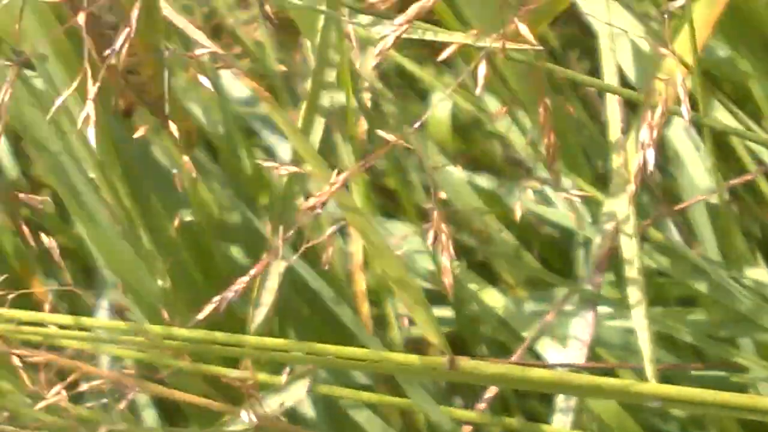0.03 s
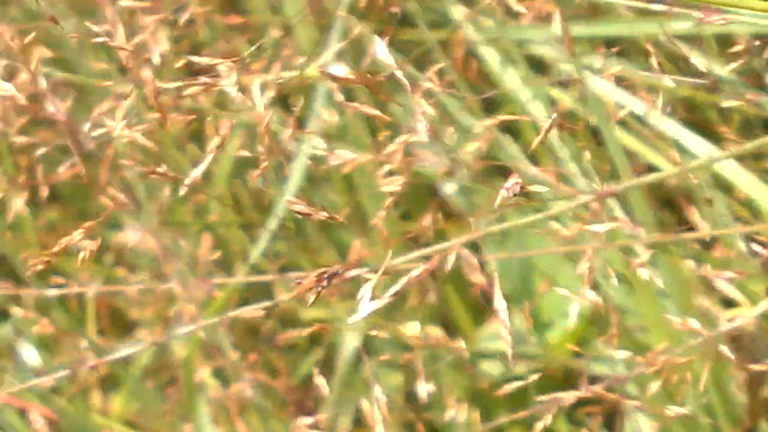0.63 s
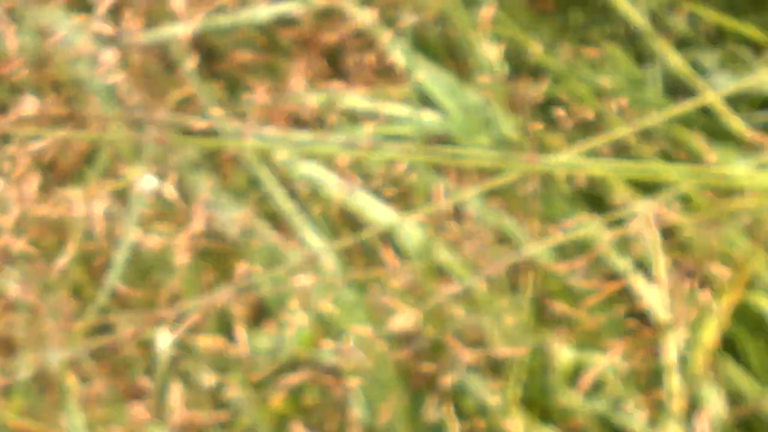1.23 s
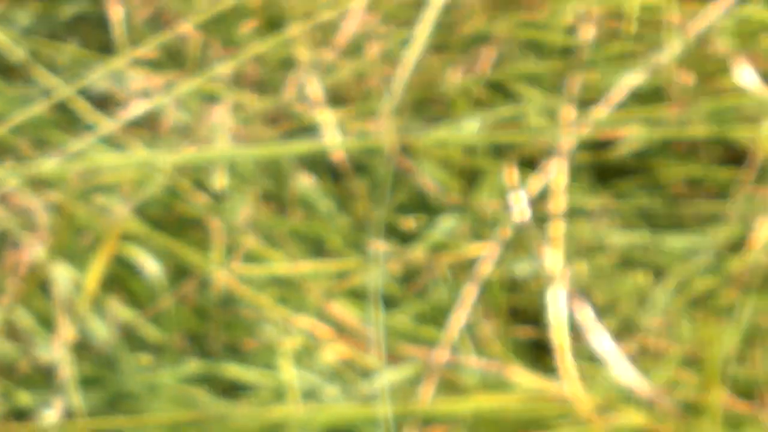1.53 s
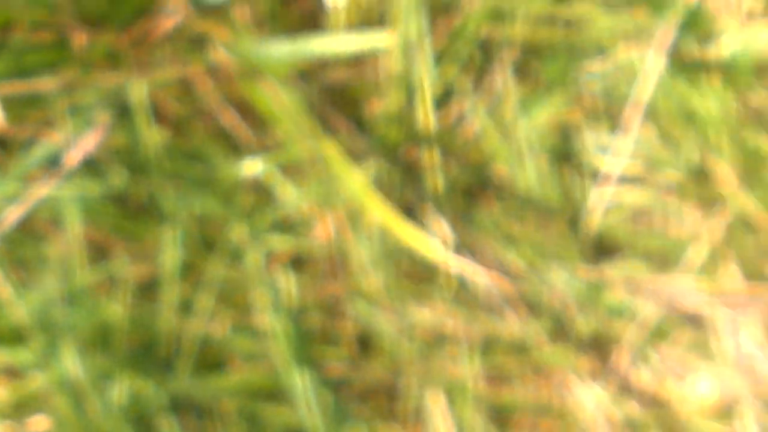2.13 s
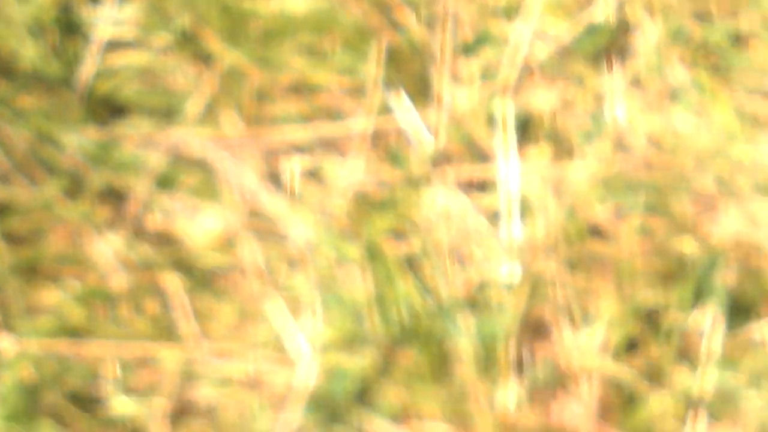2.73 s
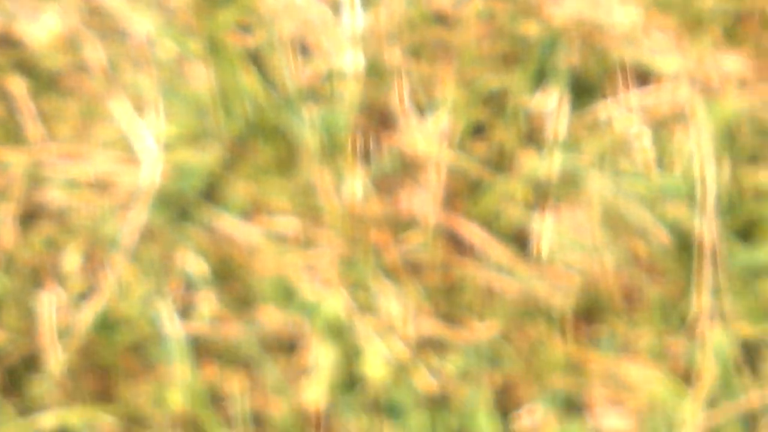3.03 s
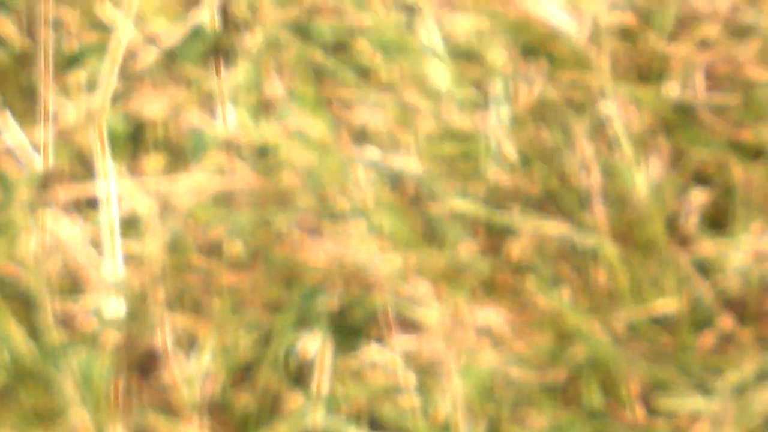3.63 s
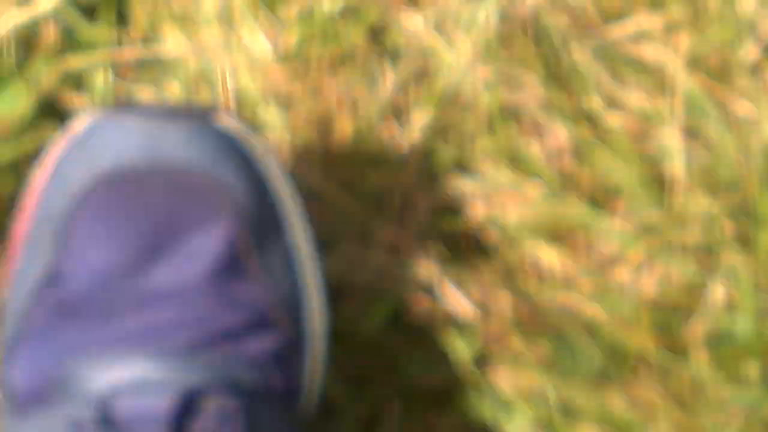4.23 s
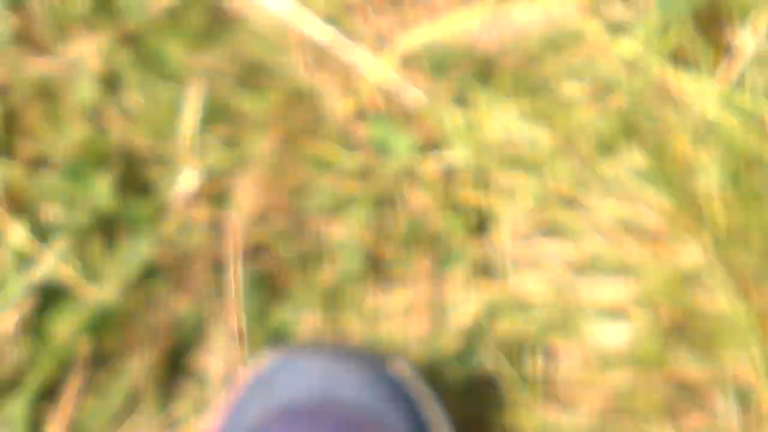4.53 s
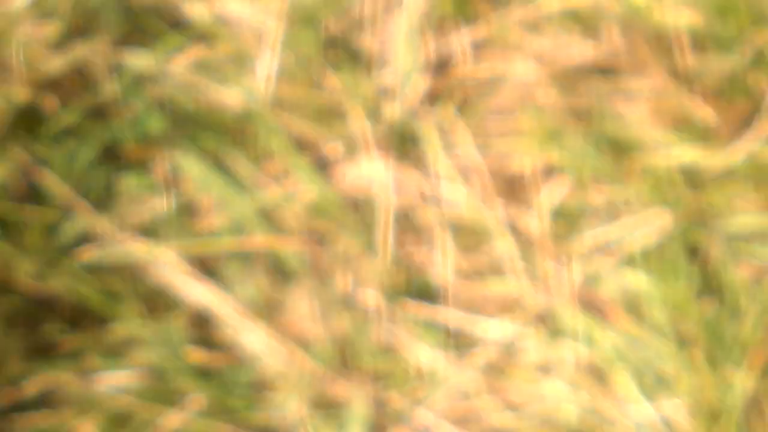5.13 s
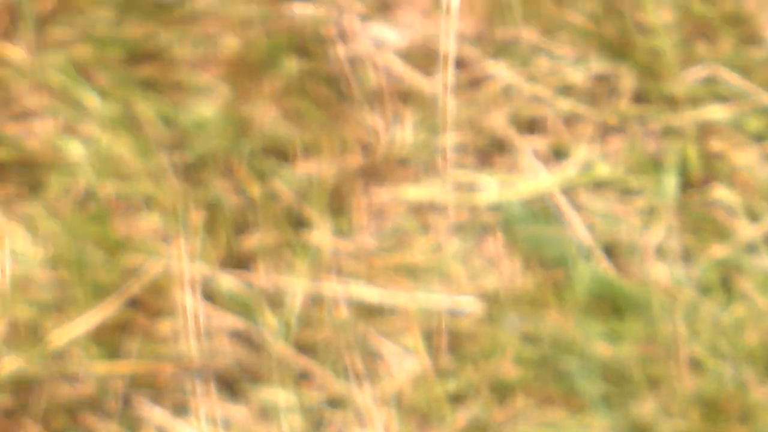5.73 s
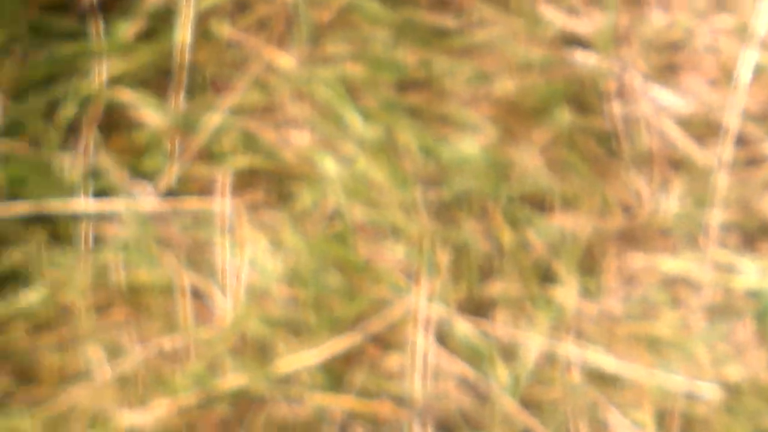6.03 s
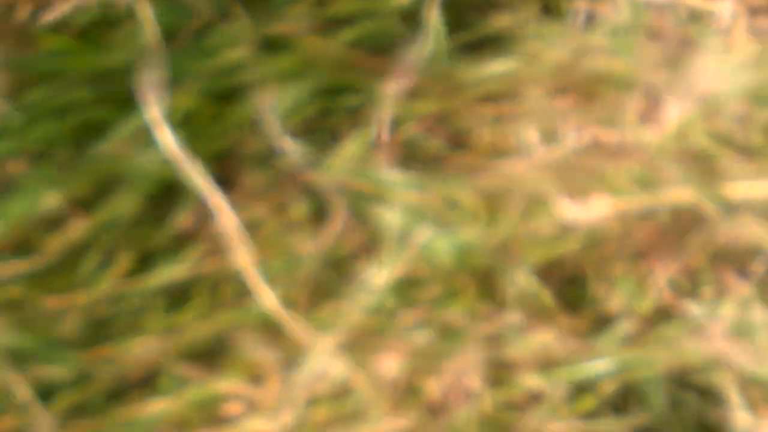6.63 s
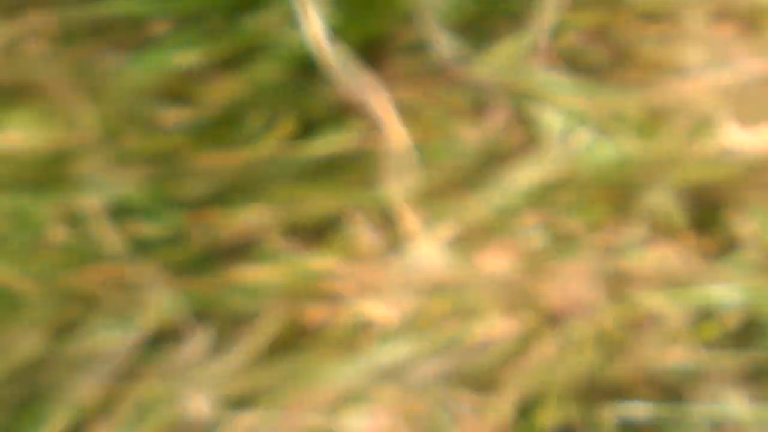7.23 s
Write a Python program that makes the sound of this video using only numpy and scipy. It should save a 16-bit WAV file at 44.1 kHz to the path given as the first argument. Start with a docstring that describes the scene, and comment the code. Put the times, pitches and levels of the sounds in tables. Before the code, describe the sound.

A sudden loud, rasping insect buzz up close, after faint steps in meadow grass under a high cricket trill.

```python
"""Close insect in a summer meadow

Bush-crickets file out a high trill over a bed of still air, rumble and a faint far drone.
Slow steps crunch the turf, swish through dry grass and snap the odd stalk. Late on, a fly-sized
insect arrives right up close, its wing tips slapping against something for a moment.
Then it hovers free on the hum of its wingbeat, swerving, and darts off."""
import sys
import numpy as np
from scipy import signal
from scipy.fft import rfft, irfft
from scipy.io import wavfile
from scipy.ndimage import uniform_filter1d

SR = 44100
rng = np.random.default_rng(int(sys.argv[2]) if len(sys.argv) > 2 else 0)


def wav_record(signal):
    """Record a signal, one row per channel, as 16-bit PCM in the file named by sys.argv[1]."""
    frames = np.transpose(np.atleast_2d(signal))
    bounded = np.clip(frames, -1, 1)
    # unit amplitude maps onto the largest positive 16-bit level
    quanta = np.round(bounded * 32767).astype(np.int16)
    wavfile.write(sys.argv[1], SR, quanta)


N = 330750
TIME = np.arange(N) / SR

# Tone curves for still air, low rumble, turf underfoot, swishing stems and cricket song.
# Each row: frequency in Hz, relative level in dB.
AIR_EQ = [(100, -9), (170, 0.5), (300, -3), (550, -9), (1200, -12), (2500, -15.5), (5000, -14),
          (7000, -15.5), (8600, -23.5), (10000, -18), (11500, -26), (16000, -35.5)]
RUMBLE_EQ = [(8.8, -44), (15, -9.5), (54, 0.5), (75, 1), (95, -5.5), (124, -7.5), (200, -23), (260, -36.5),
             (440, -120)]
TREAD_EQ = [(88, -39), (150, 1), (541, 3.5), (798, -2.5), (1400, -17), (2170, -17), (2500, -26.5),
            (3250, -55), (5500, -120)]
SWISH_EQ = [(590, -6), (1000, 3.5), (1470, -3.5), (2180, -3), (2550, -5), (3750, -0.5), (4610, -0.5),
            (8780, -17), (12000, -12), (15600, -44), (22000, -120)]
CRICKET_EQ = [(8500, -49), (10000, -33), (11600, -33.5), (12300, -25), (13000, -15), (14300, -3.5),
              (15600, 0.5), (16500, -4.5)]
# Puffs of air. Each row: centre in seconds, length in seconds, level in dB.
PUFFS = [(2.5, 0.27, -75.5), (3.844, 0.12, -69), (4.45, 0.73, -72), (5.25, 0.18, -75), (6.906, 0.69, -69.5),
         (7.322, .18, -63)]
# The far drone. Each row: centre in seconds, length in seconds, pitch in Hz, level in dB.
DRONE_SWELLS = [(0.198, 0.51, 75.7, -62), (.62, 0.34, 78, -65.5), (1.4, 0.67, 84.3, -66),
                (2.457, 0.26, 95.9, -59.5), (3.155, 0.19, 82.5, -65)]
# Thin, steady whines. Each row: pitch in Hz, level in dB.
WHINES = [(3620, -88), (5790, -84.5), (7960, -98)]
# Steps and shifts of weight. Each row: centre and length in seconds, tread and swish levels in dB.
STEPS = [(1.0, 0.47, -86, -91), (2.16, 0.79, -78.5, -73.5), (3.0, 0.79, -73.5, -83.5),
         (3.925, 0.17, -67.5, -72), (4.264, 0.86, -75, -73), (4.938, 0.34, -71, -83.5),
         (5.225, 0.29, -65, -71), (5.588, 0.24, -75.5, -71.5), (6.017, 0.35, -77.5, -74.5),
         (6.456, 0.56, -73, -78.5)]
# Seed heads brushing past. Each row: centre in seconds, length in seconds, level in dB.
BRUSHES = [(2.033, 0.31, -66), (2.567, 0.1, -72), (2.847, 0.38, -68.5), (3.164, 0.062, -67),
           (4.25, 0.15, -63), (4.873, 0.25, -63), (5.042, 0.18, -63), (5.207, .05, -57),
           (5.286, 0.065, -56), (5.592, 0.061, -65)]
# Stalks snapping and turf knocking. Each row: start in seconds, peak in dB, pitch in Hz.
SNAPS = [(2.251, -54, 3500), (3.654, -57, 470), (3.71, -49, 2040), (4.135, -54, 3250), (4.85, -54, 4000),
         (4.868, -57.5, 444), (5.046, -54, 5900), (5.112, -51, 2300), (5.1252, -38, 2250),
         (5.177, -54, 460), (5.199, -45.5, 517), (5.232, -55, 700), (5.279, -57, 450), (5.313, -51, 480),
         (5.35, -53, 472), (5.363, -55.5, 970), (5.722, -41.5, 2900), (5.727, -49, 3300),
         (5.944, -55, 4500), (5.956, -53, 4800)]
# The near cricket's verses. Each row: start in seconds, seconds until the fade, opening level in dB.
VERSES = [(1.91, 0.27, -48.5), (2.55, 0.74, -49.5), (4.153, 0.87, -48.5), (5.656, 1.31, -47.5),
          (7.37, 0.16, -46.5)]
# The insect closing in. Each row: time in seconds, level in dB relative to its closest.
APPROACH = [(6.38, -47), (6.49, -17.5), (6.555, -14), (6.584, 0)]
# Its flight, surging and slackening. Each row: time in seconds, wingbeat in Hz, buzz level in dB.
FLIGHT = [(6.44, 327.5, -82), (6.558, 310.9, -67), (6.586, 335.4, -29.5), (6.63, 320.1, -30.5),
          (6.71, 317.1, -32.5), (6.78, 307.5, -47), (6.87, 307.5, -47), (6.93, 316, -35),
          (6.99, 323.5, -31), (7.056, 309.3, -36), (7.115, 322, -29), (7.165, 310.3, -34.5),
          (7.21, 304.5, -38.5), (7.26, 316.3, -32), (7.305, 318, -30), (7.35, 304.2, -40),
          (7.392, 329, -28.5), (7.447, 327, -26.5), (7.48, 302, -44)]
# Overtones of the wing stroke. Each row: multiple of the wingbeat, relative level in dB.
WING_OVERTONES = [(3, -2.5), (4, -14), (5, -20.5), (6, -30.5), (7, -27), (8, -33), (9, -37.5), (10, -43.5),
                  (12, -46.5), (14, -57), (17, -59.5), (24, -59.5)]
# Runs of wing slaps.
# Each row: start and end in seconds, wingbeats per slap, relative level in dB, unsteadiness from 0 to 1.
SLAP_RUNS = [(6.5732, 6.602, 2, -1, .35), (6.6039, 6.634, 2, -.5, .55), (6.635, 6.769, 2, 2, 0.17),
             (6.7743, 6.828, 2, 1, .28), (6.8302, 6.892, 2, 1.5, .33), (6.8957, 6.924, 2, 0, 0.52),
             (6.9307, 6.972, 3, 2.3, .4)]
# The resonances a slap rings. Each row: frequency in Hz, width in Hz, relative level in dB.
SLAP_MODES = [(808, 335, 6), (1060, 250, -1.5), (2400, 780, -1.5), (2900, 360, 1.5), (4500, 3100, -7),
              (5400, 900, -8.5), (6830, 1160, -5), (7540, 1140, -8), (9270, 2800, -14.5), (12080, 350, -7),
              (12900, 1000, -11), (15100, 4400, -14)]

CRUISE_HZ, CRUISE_DB = 316, -30.5
TOUCH_S, PRESSED_S, FREE_S, TURN_AWAY_S = 6.6, 6.604, 6.925, 7.478  # the insect's cues


def amp(db):
    """Decibels to gain."""
    return 10 ** (np.asarray(db) / 20)


def unit(x):
    """Scales to an rms of 1."""
    return x / np.sqrt(np.mean(x ** 2) + 1e-20)


def curves(rows):
    """Turns each column of a table into a straight-line envelope."""
    s, *columns = np.transpose(rows)
    return [np.interp(TIME, s, c) for c in columns]


def ramp(s, length):
    """Rises from 0 to 1, starting at time s."""
    return np.clip((TIME - s) / length, 0, 1)


def swell(s, length, skew=0.071):
    """A soft rise to 1 at time s and a slightly slower fall."""
    u = 2 * (TIME - s) / length
    return np.exp(-(u / (1 + skew * np.tanh(u))) ** 2)


def colour(x, eq):
    """Shapes x with a tone curve and scales it to an rms of 1."""
    hz, db = np.transpose(eq)
    bins = np.fft.rfftfreq(N, 1 / SR)
    gain = amp(np.interp(np.log(bins + 1), np.log(hz + 1), db))
    return unit(irfft(rfft(x) * gain, N))


def noise():
    """White noise."""
    return rng.standard_normal(N)


def wander(hz):
    """Smooth random modulation, rolled off above hz."""
    return unit(irfft(rfft(noise()) / (1 + (np.fft.rfftfreq(N, 1 / SR) / hz) ** 4), N))


def add(mix, s, sound):
    """Mixes a sound in at time s."""
    part = mix[round(s * SR):][:len(sound)]
    part += sound[:len(part)]


def ring(modes, size=2048):
    """The causal impulse response of a set of resonances, with energy 1."""
    hz = abs(np.fft.fftfreq(size, 1 / SR))
    power = sum(amp(db) ** 2 / (1 + (2 * (hz - f) / width) ** 2) ** 2 for f, width, db in modes)
    minimum_phase = np.exp(np.conj(signal.hilbert(np.log(power) / 2)))
    response = np.fft.ifft(minimum_phase).real
    return response / np.linalg.norm(response)


def background(air_db=-72, rumble_db=-68, waver_hz=3, waver_db=3):
    """The bed: still air, low rumble with a few puffs, a far drone, and thin whines that fade away."""
    drone = sum(amp(db) * swell(s, length) * np.sin(2 * np.pi * np.cumsum(hz + waver_hz * wander(12)) / SR)
                for s, length, hz, db in DRONE_SWELLS)
    drift = 1 + 0.00087 * wander(36)
    whines = sum(amp(db) * np.sin(2 * np.pi * np.cumsum(hz * drift) / SR) for hz, db in WHINES)
    whines *= np.interp(TIME, [3.6, 4.2], [1, 0])
    puffs = sum(amp(db) * swell(s, length) for s, length, db in PUFFS)
    rumble = (amp(rumble_db) + puffs) * colour(noise(), RUMBLE_EQ)
    air = amp(air_db) * colour(noise(), AIR_EQ)
    return air + rumble + drone * amp(waver_db * wander(4.5)) + whines


def steps(crackles_per_s=1500, crackle=0.92):
    """Turf crunches dully under the shoes while dry stems swish and seed heads brush past."""
    weight = sum(amp(db) * swell(s, length) for s, length, db, _ in STEPS)
    sweep = sum(amp(db) * swell(s, length) for s, length, _, db in STEPS)
    touch = sum(amp(db) * swell(s, length) for s, length, db in BRUSHES)
    grains = unit(noise() * (rng.random(N) < crackles_per_s / SR))
    tread = colour(noise() * amp(2.7 * wander(60)), TREAD_EQ)
    swish = colour(noise() + crackle * grains, SWISH_EQ)
    brush_eq = [(2000, -20), (5000, -10), (8500, -11.5), (10500, -4.5), (12500, 1), (16000, -1.5)]
    brush = colour(noise() * amp(4.1 * wander(120)), brush_eq)
    return weight * tread + sweep * swish + touch * brush


def snaps(breadth=0.62, crumble_cycles=5, splinter=.12):
    """A stalk or a tuft gives way with a crack: thin stalks are over at once, low tufts crumble on."""
    out, t = np.zeros(N), TIME[:2500]
    for s, db, hz in SNAPS:
        crack = (t == 0) + splinter * rng.standard_normal(len(t)) * np.exp(-t * hz / crumble_cycles)
        snap = signal.fftconvolve(crack, ring([(hz, breadth * hz, 0), (1.82 * hz, 1.4 * hz, -12)]))
        add(out, s, amp(db) * snap / abs(snap).max())
    return out


def trill(syllable_hz, closing_width=.05, opening_db=-7, blur_db=-11, uneven_db=3.5, waver=.012):
    """Each syllable is a soft opening and a sharp closing stroke of the file, blurred by the grass."""
    cycle = (np.cumsum(syllable_hz * (1 + waver * wander(30))) / SR) % 1
    opening = amp(opening_db) * np.exp(-((cycle - .45) / .15) ** 2)
    closing = np.exp(-((cycle - .7) / closing_width) ** 2)
    return colour(noise() * (opening + closing + amp(blur_db)) * amp(uneven_db * wander(300)), CRICKET_EQ)


def crickets(far_db=-51.5, attack_s=.05, growth_db_per_s=1, fade_db_per_s=17.5):
    """One sings steadily far off; a nearer one sings in verses that start quickly, grow and fade out."""
    verses = np.zeros(N)
    for s, length, db in VERSES:
        growth_db = growth_db_per_s * np.clip(TIME - s, 0, length)
        fade_db = fade_db_per_s * np.maximum(TIME - s - length, 0)
        verses = np.maximum(verses, ramp(s, attack_s) * amp(db + growth_db - fade_db))
    far = trill(syllable_hz=100.9, closing_width=.1, opening_db=-10, blur_db=-5.5,
                uneven_db=0.5, waver=.003)
    near = verses * amp(.7 * wander(12)) * trill(syllable_hz=79)
    return near + amp(far_db + wander(6.8)) * far


def stroke_levels(hz, buzz_db, closest_db=-37.7, octave_db=-4.5, octave_db_per_hz=.25,
                  hampered_db=-5, hampered_octave_db=-52, shake_db=2.5, turn_db_per_s=1400):
    """The hum's levels in dB: the fundamental follows nearness, octave and overtones follow the buzz."""
    near_db, = curves(APPROACH)
    overtones = buzz_db - turn_db_per_s * np.maximum(TIME - TURN_AWAY_S, 0)
    free_octave = overtones + octave_db + octave_db_per_hz * (hz - CRUISE_HZ)
    # contact damps and shakes the stroke
    touching = ramp(TOUCH_S, 0.0049) - ramp(FREE_S, 0.02)
    octave = (1 - touching) * free_octave + touching * hampered_octave_db
    fundamental = closest_db + near_db + touching * hampered_db
    return [db + touching * shake_db * wander(59) for db in (fundamental, octave, overtones)]


def wing_hum(turns, fundamental_db, octave_db, overtones_db, brighten=0.13, flutter_db=2, air_db=-41):
    """The hum of the wing stroke: harder beats are brighter, and each sheds a small puff of air."""
    near = TIME >= APPROACH[0][0]
    angle = 2 * np.pi * turns[near]
    effort_db = np.clip(overtones_db[near] - CRUISE_DB, -10, 2)
    hum = amp(fundamental_db[near]) * np.cos(angle) + amp(octave_db[near]) * np.sin(2 * angle)
    for k in range(3, 25):
        flutter = unit(uniform_filter1d(uniform_filter1d(rng.standard_normal(len(angle)), 400), 300))
        tilt_db_per_octave = brighten * effort_db + flutter_db * flutter
        db = np.interp(k, *np.transpose(WING_OVERTONES)) + np.log2(k / 3) * tilt_db_per_octave
        hum += amp(overtones_db[near] + db) * np.cos(k * angle)
    puff_eq = [(100, 10.5), (700, 9), (1500, -9.5), (4000, -26), (7500, -28), (12000, -37.5)]
    puffs = colour(noise(), puff_eq) * (1 + np.cos(2 * np.pi * turns))
    out = amp(overtones_db + air_db) * puffs
    out[near] += np.sqrt(2) * hum
    return out


def wing_hits(turns, uneven_db=0.9, wobble_s=0.00014, crumple=0.23, crumple_s=0.002,
              rebound_s=0.0036, rebound_db=-22, press_db_per_s=850):
    """A wing tip hits on every second or third beat, crumples and rebounds."""
    hits, t = np.zeros(N), TIME[:128]
    for first, end, beats, db, unsteady in SLAP_RUNS:
        start, stop = np.interp([first, end], TIME, turns)
        for s in np.interp(np.arange(start, stop, beats), turns, TIME):
            s += unsteady * wobble_s * rng.standard_normal() - .0005
            click = (t == 0) + unsteady * crumple * rng.standard_normal(len(t)) * np.exp(-t / crumple_s)
            click *= amp(db + unsteady * uneven_db * rng.standard_normal())
            add(hits, s, click)
            add(hits, s + rebound_s * rng.uniform(1.0, 1.1), amp(rebound_db) * click)
    # the hits reach full strength as the insect presses in
    return hits * amp(-press_db_per_s * np.clip(PRESSED_S - TIME, 0, .1))


def disperse(response, delay_s=.0009, at_hz=1000):
    """Bending waves run faster at high pitch: delay falls as 1 / sqrt(Hz), so the treble lands first."""
    hz = np.fft.rfftfreq(len(response), 1 / SR)
    return irfft(rfft(response) * np.exp(-4j * np.pi * delay_s * np.sqrt(at_hz * hz)))


def wing_slaps(hits, slap_db=-5.5, scrape_db=-21, scrape_s=0.015, thump_db=-32):
    """Each hit rings the resonances and scrapes along, making a bright rasp over a soft thump."""
    fade = np.exp(-TIME[:1000] / scrape_s)
    scrape = np.sqrt(abs(signal.oaconvolve(hits ** 2, fade / fade.sum())[:N])) * noise()
    rasp = signal.oaconvolve(hits + amp(scrape_db) * scrape, disperse(ring(SLAP_MODES)))[:N]
    # the modes cancel in one narrow band
    rasp = signal.lfilter(*signal.iirnotch(6150, Q=14, fs=SR), rasp)
    # so small a source radiates little bass
    rasp = signal.sosfilt(signal.butter(4, 620, "high", fs=SR, output="sos"), rasp)
    thump = signal.oaconvolve(hits, ring([(262, 240, 0)]))[:N]
    return amp(slap_db) * rasp + amp(thump_db) * thump


def insect(jitter=.0014):
    """One wingbeat drives both the hum and the slaps."""
    hz, buzz_db = curves(FLIGHT)
    turns = np.cumsum(hz * (1 + jitter * wander(50))) / SR  # running count of wingbeats
    return wing_hum(turns, *stroke_levels(hz, buzz_db)) + wing_slaps(wing_hits(turns))


def scene():
    """All layers in one mono mix."""
    return (insect() + crickets() + steps() + snaps() + background())[None]


def record(dry):
    """A steep low-pass trims the very top of the mix."""
    low_pass = signal.firwin(901, cutoff=15900, window=("kaiser", 9), fs=SR)
    return signal.oaconvolve(dry, low_pass[None], "same")


dry = scene()
out = record(dry)
wav_record(out)
```